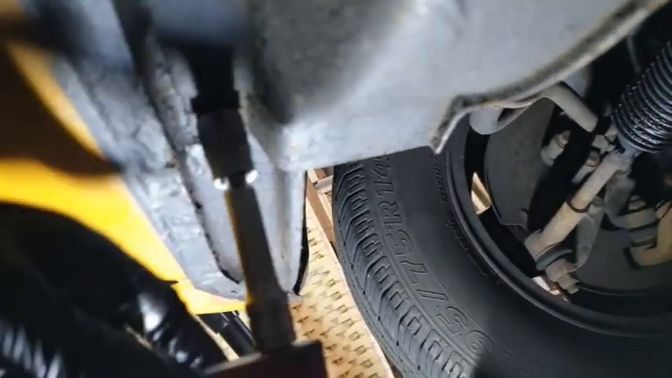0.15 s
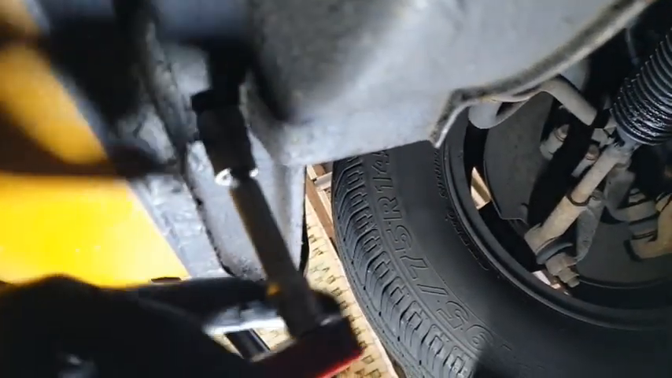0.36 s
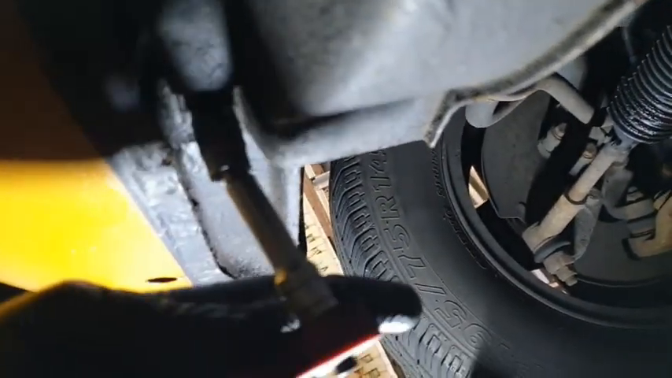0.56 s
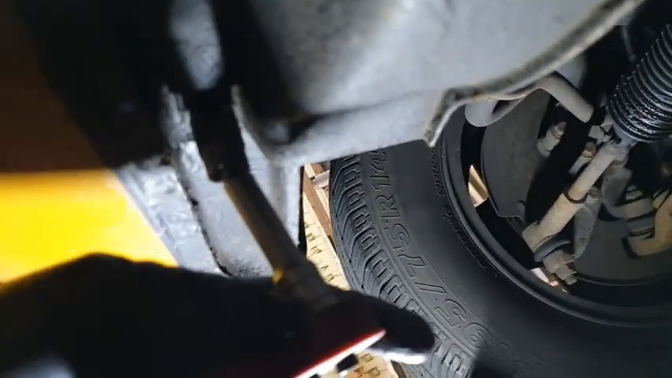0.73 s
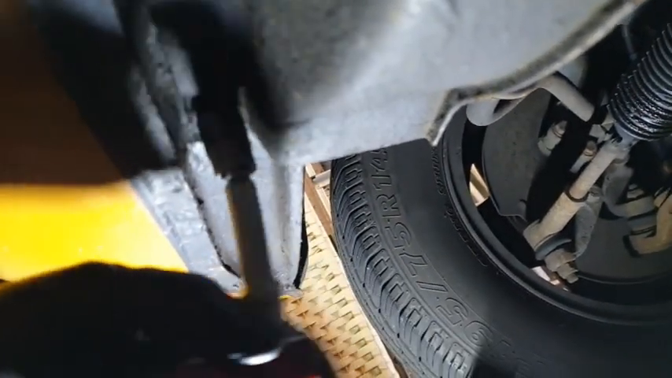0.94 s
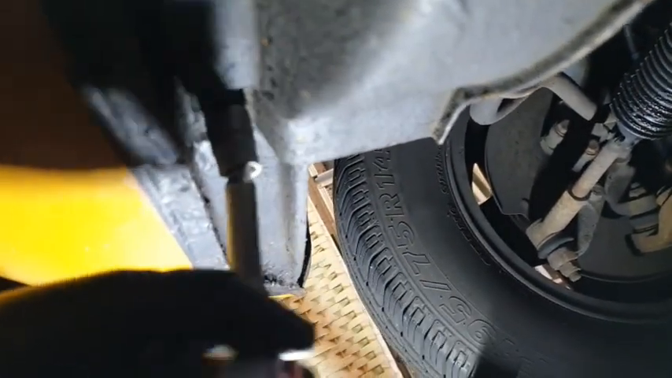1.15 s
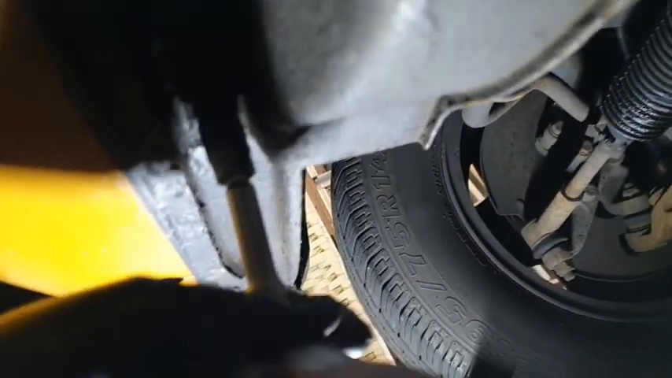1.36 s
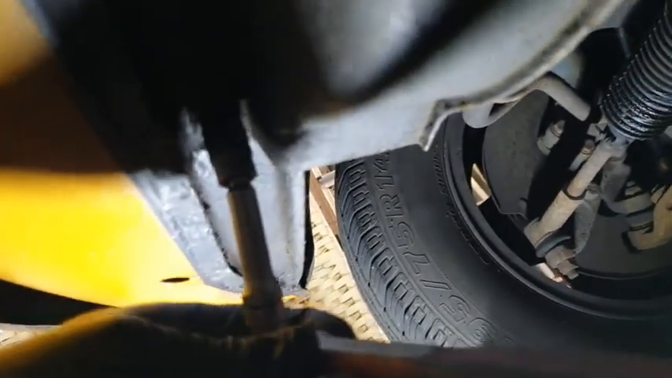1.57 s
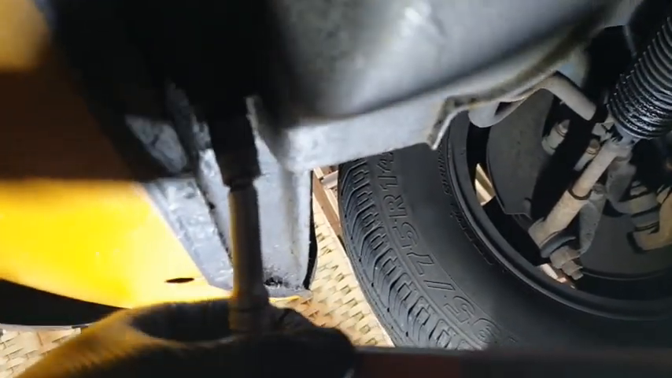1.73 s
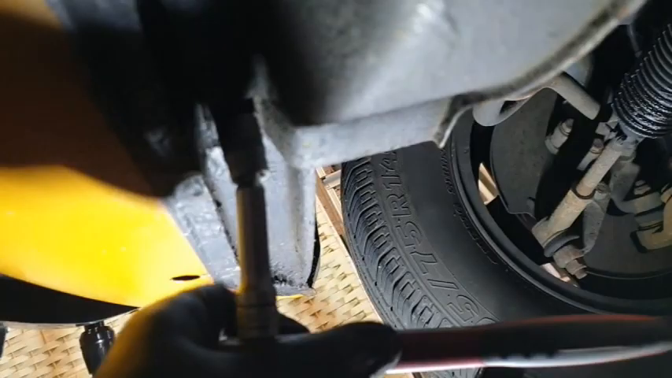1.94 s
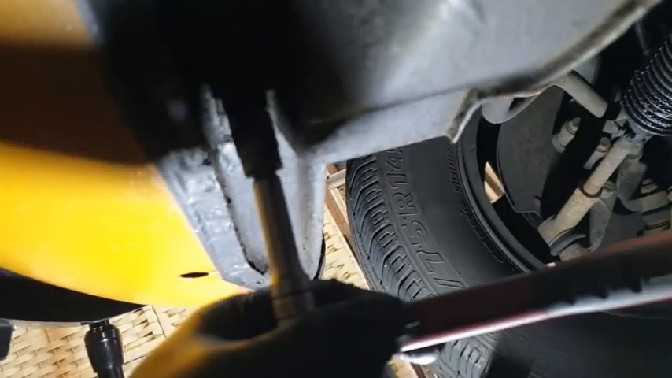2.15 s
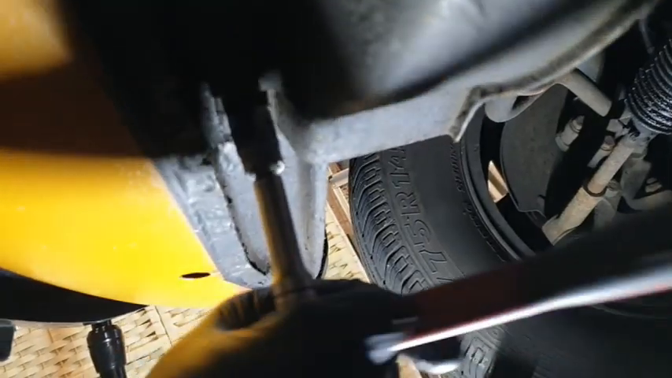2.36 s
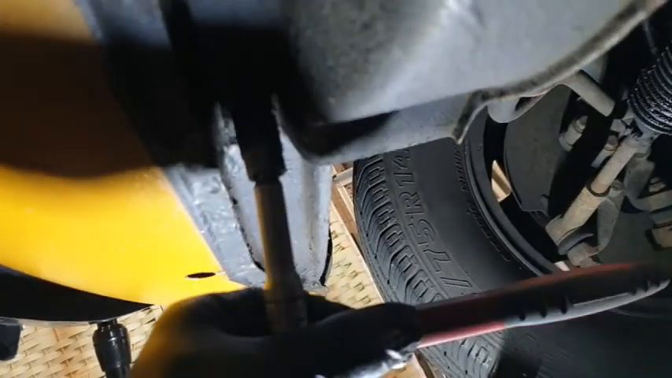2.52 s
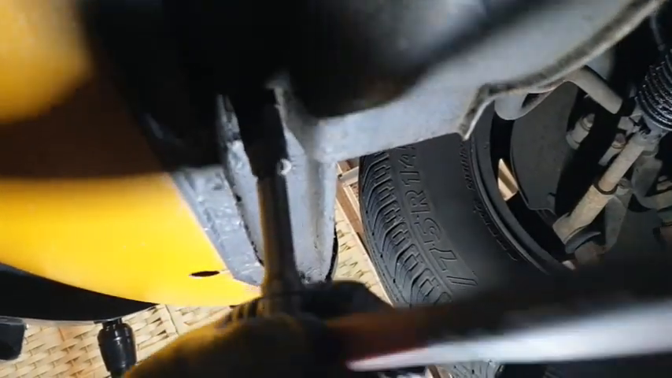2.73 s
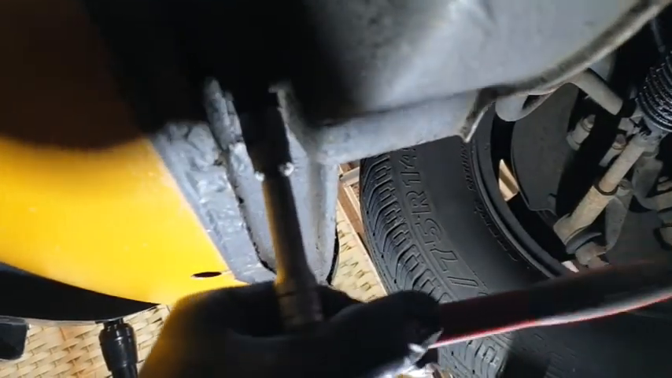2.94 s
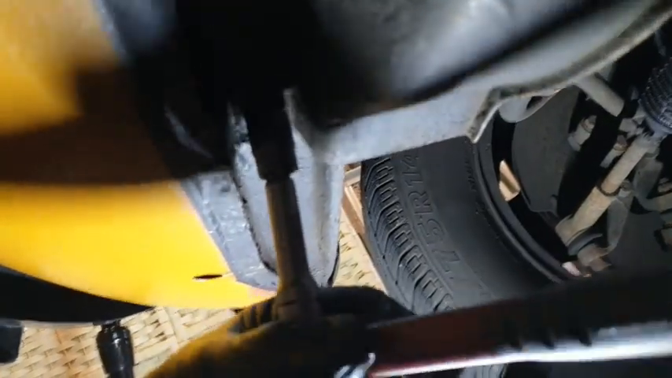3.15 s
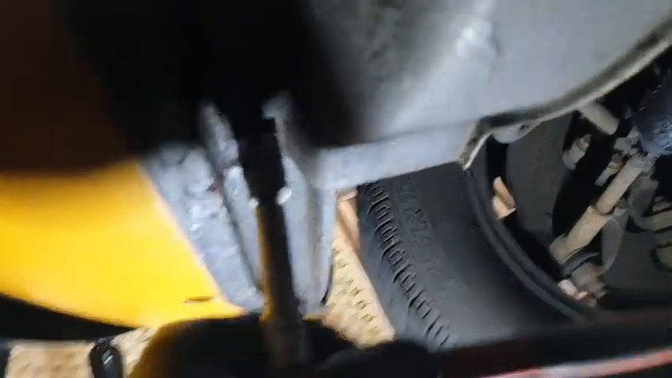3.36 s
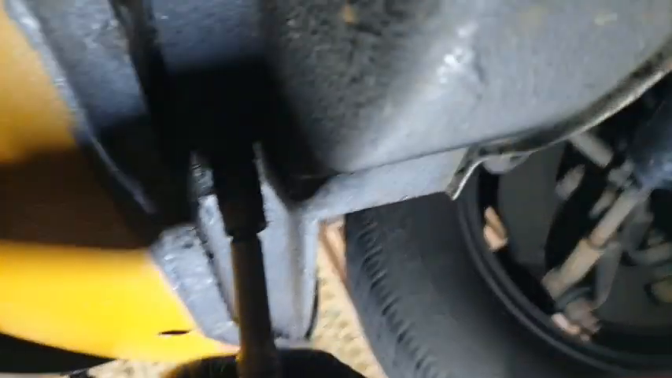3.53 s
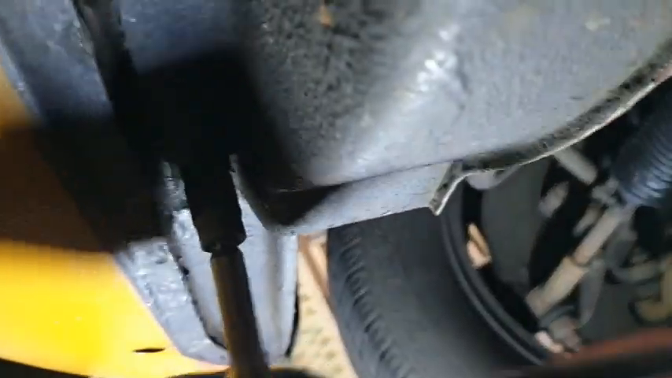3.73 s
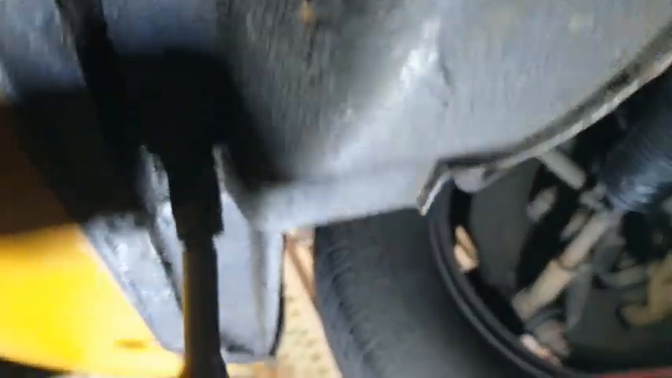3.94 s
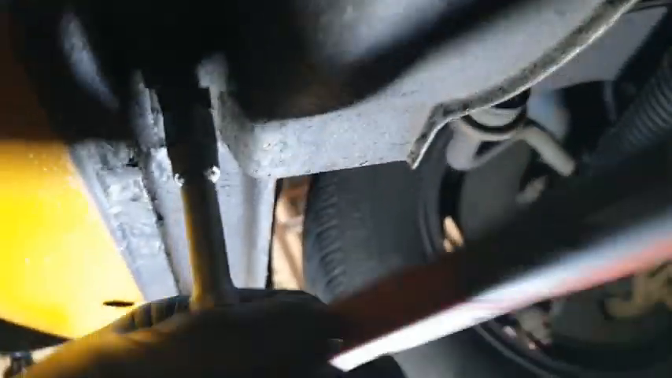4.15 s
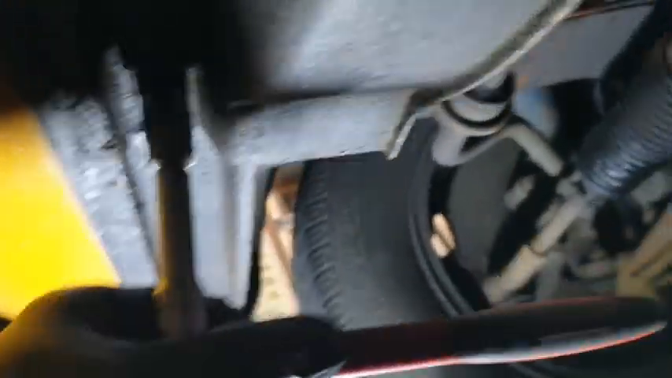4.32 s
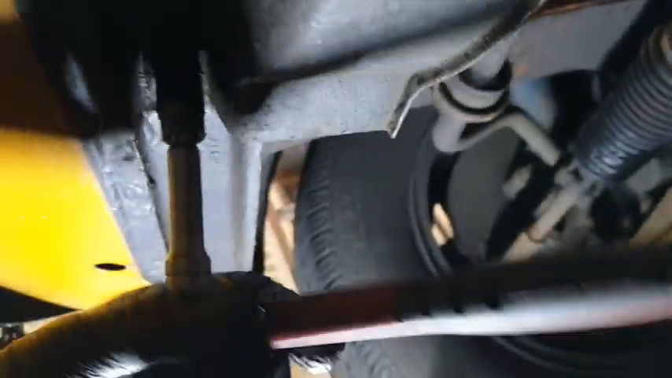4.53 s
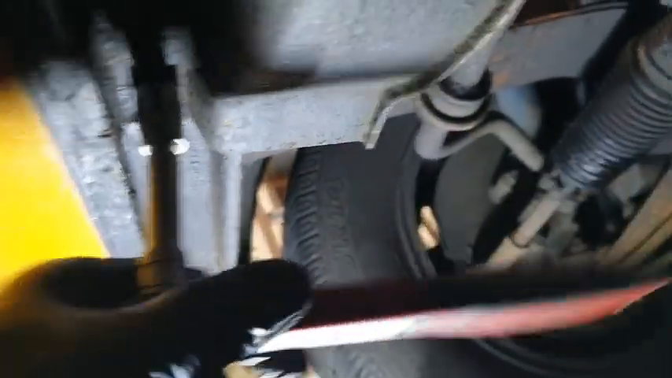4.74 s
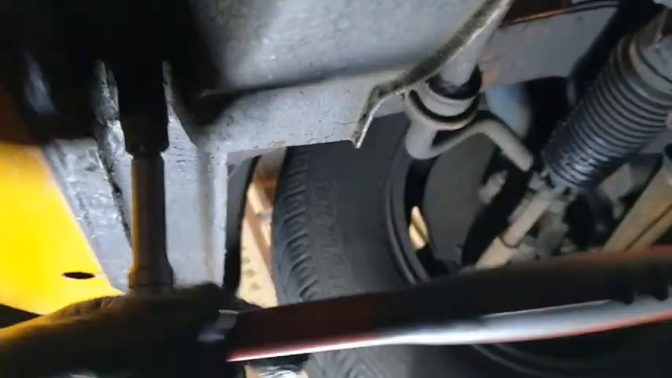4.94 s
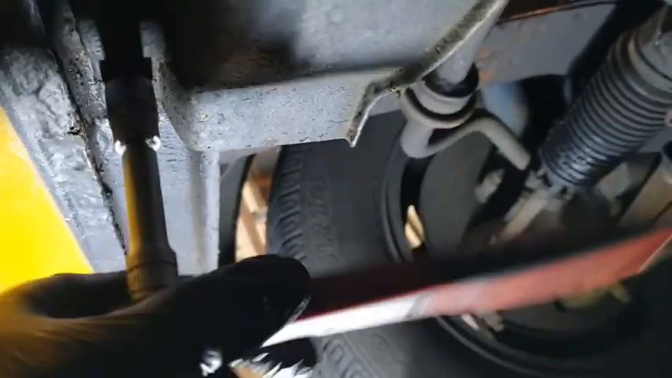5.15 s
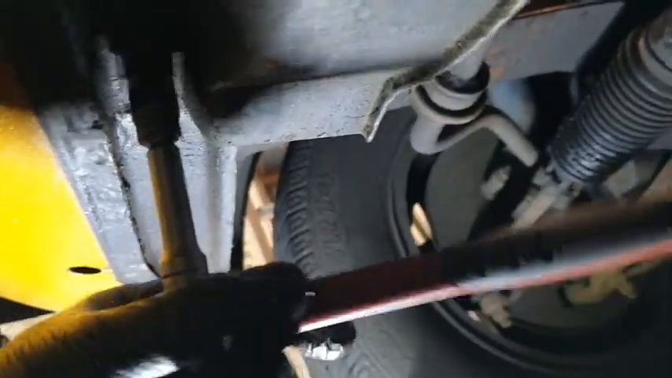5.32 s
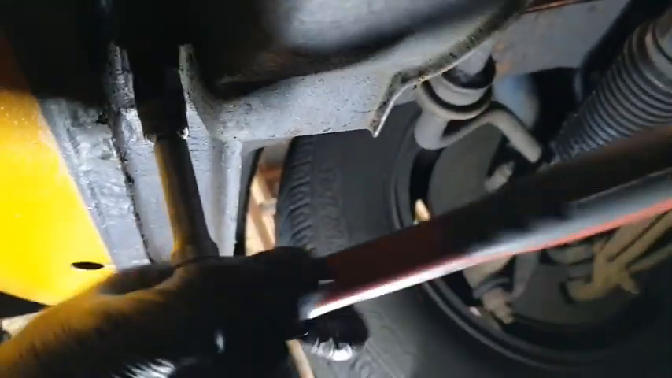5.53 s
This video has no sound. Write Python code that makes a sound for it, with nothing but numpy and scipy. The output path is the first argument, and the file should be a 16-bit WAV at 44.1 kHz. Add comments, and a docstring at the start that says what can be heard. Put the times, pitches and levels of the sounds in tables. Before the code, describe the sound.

First come faint cloth brushes, low handling bumps and dull, hollow knocks of a loose socket, growing busier. Then a ratchet handle works back and forth: three to six fast bright clicks per back swing, a short rough forward turn, repeated about twice a second. The sound is near and dry, coloured by the car's underbody and a small, still garage.

```python
"""A ratchet's pawl snaps over a few teeth on each back swing of eight strokes, ringing the steel.
A gloved hand first fits the socket to a bolt under a car; the socket knocks in its play.
Snaps, knocks and joint taps are noise bursts shaped by underbody and garage echoes, then filtered.
Thread, socket scrape, glove and sleeve are grainy coloured noise, gated by the moves of the hand.
Handling rumble, groans and soft thumps lie below, over the still air of the garage."""
import sys
import numpy as np
from scipy import signal
from scipy.fft import rfft, irfft
from scipy.io import wavfile
from scipy.ndimage import uniform_filter1d

SR = 44100
rng = np.random.default_rng(int(sys.argv[2]) if len(sys.argv) > 2 else 0)


def output_pcm(signal):
    """Save a mono or channel-first signal as 16-bit PCM at the path in sys.argv[1].

    Samples are clipped to [-1, 1] before scaling.
    """
    pcm = np.clip(np.atleast_2d(signal).T, -1, 1) * 32767
    wavfile.write(sys.argv[1], SR, np.round(pcm).astype(np.int16))


N = 246078
BLOW_SAMPLES = 16384
TIME_S, AGE_S = np.arange(N) / SR, np.arange(BLOW_SAMPLES) / SR  # scene time, time since a blow
HZ = np.fft.rfftfreq(2 * BLOW_SAMPLES, 1 / SR)


def amp(db):
    """Amplitude ratio of a level in dB."""
    return 10 ** (np.asarray(db) / 20)


def read(points, hz):
    """A spectrum joined by straight lines on a log-frequency axis."""
    point_hz, value = np.transpose(points)
    return np.interp(np.log(hz + 1), np.log(point_hz + 1), value)


def add(mix, start_s, sound):
    """Mixes a sound into the scene from start_s on."""
    part = mix[:, max(round(start_s * SR), 0):][:, :sound.shape[1]]
    part += sound[:, :part.shape[1]]


def move(start_s, length_s, rise_s, fall_s, sag_db_per_s=0):
    """Gain of one move of the hand: linear rise, hold with optional sag, exponential fall."""
    age_s = np.maximum(TIME_S - start_s, 0)
    rise = np.minimum(age_s / rise_s, 1)
    fall = np.exp(-np.maximum(age_s - length_s, 0) / fall_s)
    return rise * amp(-sag_db_per_s * age_s) * fall


def bump(hz, centre_hz, width_hz):
    """The shape of one resonance, 1 at its top."""
    return 1 / (1 + (2 * (hz - centre_hz) / width_hz) ** 2)


# Resonances and hollows of floor pan and gap below. Each row: centre in Hz, width in Hz, gain in dB.
PANEL_MODES = [(192.8, 21.3, 12), (280, 50, 5.5), (405, 17, 3), (548, 38, 7), (599, 164, -6),
               (754, 19.3, 6), (875, 150, 3.5), (1224, 98, 5.5), (1300, 58, -9), (1500, 19, -4.5),
               (1606, 28, 3), (1682, 44, 4.5), (1770, 60, 7), (1924, 16, 8), (2380, 58, 4), (2930, 81, 4.5),
               (5650, 160, 3)]


def panels_db(hz):
    """Colour that the car's panels give to whatever shakes them."""
    return sum(db * bump(hz, centre_hz, width_hz) for centre_hz, width_hz, db in PANEL_MODES)


def contact_modes_db(depth_db, width_hz, count=16):
    """Each new contact point favours other modes of the steel; width_hz holds at 5 kHz."""
    centres_hz = np.geomspace(1300, 14500, count) * rng.uniform(.93, 1.07, count)
    heights = rng.uniform(.3, 1.2, count)
    shape = sum(height * bump(HZ, centre_hz, width_hz * np.sqrt(centre_hz / 5000))
                for centre_hz, height in zip(centres_hz, heights))
    return depth_db * (shape - uniform_filter1d(shape, 2001))  # less its average over 2.7 kHz


# Likeness of the two channels. Each row: frequency in Hz, correlation from -1 to 1.
CHANNEL_LIKENESS = [(50, 0.9), (130, 0.95), (300, 0.6), (550, 0.6), (850, 0.4), (1200, 0.069), (1800, -0.6),
                    (2600, 0.24), (4500, 0.099), (16000, -0.056)]
# Stereo balance. Each row: frequency in Hz, left minus right in dB.
CHANNEL_BALANCE = [(60, 0), (180, 4.5), (380, 8.5), (700, 6), (1300, 2), (2600, 2.5), (4500, 3),
                   (6200, -1.5), (7300, 7), (8600, 10), (10500, 7.5), (13500, 2), (15500, 2.5)]


def stereo(z, hz):
    """Two unrelated spectra become left and right, alike and balanced by frequency."""
    same = np.clip(read(CHANNEL_LIKENESS, hz), -1, 1)
    tilt = amp(read(CHANNEL_BALANCE, hz) / 2)
    right = same * z[0] + np.sqrt(1 - same ** 2) * z[1]
    return np.array([z[0] * tilt, right / tilt])


def coloured(sound, colour_db):
    """Minimum-phase filter: the colour rings after the blow, never before."""
    log_gain = np.log(amp(np.r_[colour_db, colour_db[-2:0:-1]]))
    response = np.exp(np.conj(signal.hilbert(log_gain)))[:len(HZ)]
    spectrum = stereo(rfft(sound, 2 * BLOW_SAMPLES), HZ)
    return irfft(spectrum * response)[:, :BLOW_SAMPLES]


# Reflections by band, levels relative to the underbody. Each row: centre in Hz, first flash in dB,
# underbody t60 in seconds, garage in dB, garage t60 in seconds.
ECHO_BANDS = [(100, -21, 0.16, -9, 0.47), (300, -9, 0.18, 2.5, 0.22), (800, -7, 0.14, -8.5, 0.17),
              (1800, 5.5, 0.11, -9, 0.12), (3880, 7.5, 0.039, -10, 0.12), (6700, 13.5, 0.044, -13, 0.13),
              (13100, 12, 0.055, -18.5, 0.16)]


def echoes(flash_s):
    """One blow as it arrives: a flash off the tool, dense underbody reflections, the garage."""
    z = rfft(rng.choice([-1., 1.], (2, BLOW_SAMPLES)), 2 * BLOW_SAMPLES)
    out = 0
    centres_hz = [row[0] for row in ECHO_BANDS]
    band_weights = np.eye(len(ECHO_BANDS))
    for weights, (hz, flash_db, near_t60_s, room_db, room_t60_s) in zip(band_weights, ECHO_BANDS):
        band = irfft(z * read(np.c_[centres_hz, weights], HZ))[:, :BLOW_SAMPLES]
        # flash_s is the time constant at 7 kHz; the treble of the flash dies first
        flash = np.exp(-AGE_S / (flash_s * (7000 / hz) ** .4))
        power = (amp(flash_db) * flash) ** 2
        power += amp(-60 * AGE_S / near_t60_s) ** 2
        power += amp(room_db - 60 * AGE_S / room_t60_s) ** 2
        out = out + band * np.sqrt(power * SR / power.sum())
    return out * (1 - np.exp(-AGE_S / .0001))


def blend(paths, shared):
    """Part of the echo pattern stays from blow to blow, part changes as hand and tool move."""
    shared = np.clip(shared, 0, 1)
    weights = rng.standard_normal(len(paths) - 1)
    moving = np.tensordot(weights / np.linalg.norm(weights), paths[1:], 1)
    return np.sqrt(shared) * paths[0] + np.sqrt(1 - shared) * moving


# Steel modes of wrench and extension. Each row: frequency in Hz, level in dB, t60 in seconds.
STEEL_MODES = [(970, -27.5, 0.32), (1790, -34.5, 0.066), (2295, -30, 0.56), (4270, -16.5, 0.057),
               (5670, -22.5, 0.075), (6300, -39, .1), (6800, -22.5, 0.11)]


def steel():
    """The tool's own modes: decaying sines, each with a random phase per channel."""
    out = 0
    for hz, db, t60_s in STEEL_MODES:
        phase = hz * AGE_S + rng.random((2, 1))
        mode = amp(-60 * AGE_S / t60_s) * np.sin(2 * np.pi * phase)
        out = out + amp(db) * mode / np.sqrt((mode ** 2).sum() / (2 * SR))
    return out


def friction(colour, grain_db, grain_s, panel_share):
    """Noise that comes in small uneven slips, coloured by what it shakes; its mono mix has rms 1."""
    hz = np.fft.rfftfreq(N, 1 / SR)
    slips = irfft(rfft(rng.standard_normal(N)) / (1 + (hz * grain_s) ** 2), N)
    slip_gain = amp(grain_db * np.clip(slips / slips.std(), -3, 3))
    z = rfft(rng.standard_normal((2, N)) * slip_gain)
    gain = amp(read(colour, hz) + panel_share * panels_db(hz))
    out = irfft(stereo(z, hz) * gain, N)
    return out / out.mean(0).std()


# Spectrum of the still garage. Each row: frequency in Hz, relative density in dB.
AIR_COLOUR = [(18, -33.5), (30, 16), (97, 11), (379, -12), (532, 7.5), (1330, -66), (6540, -29.5),
              (7260, -54), (11900, -37), (15500, -34.5)]
AIR_DB = -70.5


def air():
    """The still air of the garage: steady, faintly uneven noise."""
    return amp(AIR_DB) * friction(AIR_COLOUR, grain_db=1.5, grain_s=.01, panel_share=0)


# Soft low thumps. Each row: start in seconds, peak in dB, pitch in Hz.
THUMP_EVENTS = [(0.506, -42.5, 55.4), (2.553, -39.5, 100), (4.48, -40, 98), (5.375, -42, 188)]


def thumps():
    """A soft thump: a sine that swells for 25 ms and dies away."""
    out = np.zeros((2, N))
    swell = AGE_S / .025 * np.exp(1 - AGE_S / .025)
    for start_s, peak_db, hz in THUMP_EVENTS:
        add(out, start_s, amp(peak_db) * swell * np.sin(2 * np.pi * hz * AGE_S)[None])
    return out


# The hand leans on the tool. Each row: start in seconds, length in seconds, rumble level in dB.
LEAN_MOVES = [(0, 0.054, -51), (0.225, 0.051, -57), (0.415, .22, -53), (0.73, 0.091, -68), (0.985, .1, -54),
              (1.118, 0.41, -51), (1.62, 0.25, -53), (1.93, 0.37, -54.5), (2.302, 0.25, -58),
              (2.533, .25, -44.5), (2.786, 0.32, -48), (3.08, .32, -61), (3.474, 0.15, -49),
              (3.74, 0.14, -53), (4.224, 0.25, -56), (4.476, 0.28, -47.5), (4.814, 0.23, -57.5),
              (5.042, 0.46, -51.5), (5.491, .12, -45.5)]
LEAN_RISE_S, LEAN_FALL_S, LEAN_SAG_DB_PER_S, RESTING_RUMBLE_DB = 0.012, 0.026, 13, -62.5
# Groans as the hand changes grip. Each row: start in seconds, length in seconds, level in dB.
GROAN_MOVES = [(1.622, 0.11, -52), (1.777, 0.032, -44.5), (1.842, 0.024, -62.5)]
GROAN_RISE_S, GROAN_FALL_S = 0.0094, 0.034
# Spectrum of the rumble. Each row: frequency in Hz, relative density in dB.
RUMBLE_SPECTRUM = [(20, -22), (38, -17), (58, 1.5), (80, -2), (105, 0.5), (145, -5), (200, -8),
                   (400, -48.5), (1000, -53.5)]
# Spectrum of the groans. Each row: frequency in Hz, relative density in dB.
GROAN_SPECTRUM = [(40, -28), (100, -17), (140, 4.5), (185, 2), (260, -25), (500, -35), (2000, -70)]


def handling():
    """The tool rumbles under the weight of the hand, and groans as the grip changes."""
    weight = sum(amp(db) * move(start_s, length_s, LEAN_RISE_S, LEAN_FALL_S, LEAN_SAG_DB_PER_S)
                 for start_s, length_s, db in LEAN_MOVES)
    regrip = sum(amp(db) * move(start_s, length_s, GROAN_RISE_S, GROAN_FALL_S)
                 for start_s, length_s, db in GROAN_MOVES)
    rumble_gain = np.hypot(amp(RESTING_RUMBLE_DB), weight)
    rumble = rumble_gain * friction(RUMBLE_SPECTRUM, grain_db=-3.5, grain_s=0.046, panel_share=0.44)
    groan = regrip * friction(GROAN_SPECTRUM, grain_db=5.5, grain_s=0.021, panel_share=.4)
    return rumble + groan + thumps()


# Brushes along the tool while fitting it. Each row: middle in seconds, length in seconds,
# glove level in dB, sleeve level in dB.
BRUSH_MOVES = [(0.14, 0.14, -59, -84), (0.368, 0.19, -62.5, -73), (0.472, 0.036, -59, -82),
               (0.59, .09, -58, -79), (0.772, 0.079, -49.5, -88), (0.998, 0.064, -62, -77),
               (1.144, .06, -53.5, -58), (1.264, 0.034, -54, -57), (1.332, 0.048, -62, -77),
               (1.459, 0.067, -52.5, -85), (1.657, 0.18, -65, -66.5), (1.784, 0.031, -56.5, -70),
               (1.97, 0.066, -61.5, -72), (2.143, 0.082, -55, -59)]
RESTING_RUB_DB = -83
# Spectrum of the glove rub. Each row: frequency in Hz, relative density in dB.
GLOVE_SPECTRUM = [(300, -24.5), (1500, -10), (3500, -8), (4800, -3), (6400, 3.5), (8000, -2.5), (11000, 2),
                  (15500, -0.5)]
# Spectrum of the sleeve rub. Each row: frequency in Hz, relative density in dB.
SLEEVE_SPECTRUM = [(500, -29.5), (1800, -4), (3800, -3), (5000, 1), (6400, 1.5), (8000, -21), (15500, -11)]


def cloth(sliding):
    """Each brush of glove and sleeve swells and fades evenly; later the glove slides on the handle."""
    glove, sleeve = amp(RESTING_RUB_DB) + sliding, 0
    for middle_s, length_s, glove_db, sleeve_db in BRUSH_MOVES:
        swell = 1 / np.cosh(np.pi * np.clip((TIME_S - middle_s) / length_s, -10, 10))
        glove = glove + amp(glove_db) * swell
        sleeve = sleeve + amp(sleeve_db) * swell
    glove_rub = glove * friction(GLOVE_SPECTRUM, grain_db=2.5, grain_s=0.0019, panel_share=.3)
    sleeve_rub = sleeve * friction(SLEEVE_SPECTRUM, grain_db=1.0, grain_s=0.004, panel_share=.3)
    return glove_rub + sleeve_rub


# A free back swing, then a drive that turns the bolt. Each row: swing start in seconds, drive start
# in seconds, drive length in seconds, then drive levels of thread grind, socket scrape, glove slide in dB.
STROKE_MOVES = [(2.19, 2.349, 0.15, -47, -56, -67), (2.62, 2.785, 0.2, -51.5, -76, -68),
                (3.009, 3.221, 0.15, -51.5, -75, -67), (3.428, 3.695, 0.14, -53.5, -52.5, -71),
                (3.942, 4.158, 0.18, -51.5, -62.5, -70), (4.414, 4.671, 0.12, -53, -57, -63.5),
                (4.877, 5.102, 0.13, -51, -57, -70.5), (5.304, 5.511, .15, -42.5, -59, -66.5)]
SWING_S, SWING_GRIND_DB, SWING_SLIDE_DB = 0.2, -49.5, -70.5
STROKE_RISE_S, STROKE_FALL_S = 0.038, 0.059
STROKE_SAG_DB_PER_S = 14  # the hand eases off towards the end of each move


def strokes():
    """Gains of thread grind, socket scrape and glove slide as the handle swings back and drives."""
    grind = scrape = slide = 0
    shape = STROKE_RISE_S, STROKE_FALL_S, STROKE_SAG_DB_PER_S
    for swing_start_s, drive_start_s, drive_s, grind_db, scrape_db, slide_db in STROKE_MOVES:
        swing = move(swing_start_s, SWING_S, *shape)
        drive = move(drive_start_s, drive_s, *shape)
        grind = grind + amp(SWING_GRIND_DB) * swing + amp(grind_db) * drive
        scrape = scrape + amp(scrape_db) * drive
        slide = slide + amp(SWING_SLIDE_DB) * swing + amp(slide_db) * drive
    return grind, scrape, slide


# Colour of a knock or joint tap. Each row: frequency in Hz, gain in dB.
KNOCK_COLOUR = [(40, -4), (110, 5.5), (210, 12), (400, 11.5), (800, 12.5), (1400, 5.5), (3000, -2.5),
                (4200, -8), (8000, -25.5), (16000, -45)]


def rattle(turning, per_s, tap_db):
    """Tiny taps of four loose joints come at random, harder while the thread grinds."""
    tapped = rng.random(N) < per_s / SR
    strength = amp(3.43 * np.minimum(rng.exponential(1, N), 3))
    taps = tapped * strength * turning
    joint = rng.integers(0, 4, N)
    out = 0
    for k in range(4):
        colour = read(KNOCK_COLOUR, HZ) + panels_db(HZ) + contact_modes_db(depth_db=10.5, width_hz=200)
        tap = coloured(echoes(flash_s=0.00093), colour)
        out = out + signal.oaconvolve((taps * (joint == k))[None], tap, axes=1)[:, :N]
    return amp(tap_db) * out


# Fingers twist the socket onto the bolt. Each row: start in seconds, length in seconds, grind in dB.
TWIST_MOVES = [(0, 0.0081, -63), (0.4, 0.27, -59), (0.955, 0.35, -57.5), (1.207, 0.28, -52.5),
               (1.911, 0.21, -50.5)]
TWIST_RISE_S, TWIST_FALL_S, RESTING_GRIND_DB = 0.042, 0.035, -67
# Spectrum of the thread grind. Each row: frequency in Hz, relative density in dB.
GRIND_SPECTRUM = [(60, -8), (130, 0), (200, -1.5), (400, 8), (800, 1.5), (1400, -13.5), (3000, -16),
                  (6000, -19), (16000, -53)]
# Spectrum of the socket scraping in its play. Each row: frequency in Hz, relative density in dB.
SCRAPE_SPECTRUM = [(200, -14), (800, 1), (1500, 9.5), (3200, 2), (5000, -20.5), (8000, -28), (16000, -38.5)]


def thread(driven, scraping):
    """Thread grinds and joints rattle as the tool twists or strokes; under load the socket scrapes."""
    twisted = sum(amp(db) * move(start_s, length_s, TWIST_RISE_S, TWIST_FALL_S)
                  for start_s, length_s, db in TWIST_MOVES)
    turning = driven + twisted
    grind_gain = amp(RESTING_GRIND_DB) + turning
    grind = grind_gain * friction(GRIND_SPECTRUM, grain_db=2.5, grain_s=0.011, panel_share=0.85)
    scrape = scraping * friction(SCRAPE_SPECTRUM, grain_db=4.5, grain_s=0.004, panel_share=1.0)
    return grind + scrape + rattle(turning, per_s=45, tap_db=-23)


# Louder knocks of socket and extension on the bolt. Each row: start in seconds, relative level in dB,
# weight in dB, hardness in dB, main resonance in Hz.
KNOCK_EVENTS = [(0.213, -61, 2.5, 2, 720), (0.435, -67, 17.5, 4, 890), (0.475, -56, 0, 11, 1790),
                (0.556, -65.5, -13, 15, 1640), (0.618, -56, 6, -1, 860), (0.778, -70, 5, -29, 730),
                (0.825, -70, 1, -1, 890), (0.949, -70, 5, -1, 740), (0.988, -58.5, 2, -24, 706),
                (1.032, -56.5, 0, 6.5, 1800), (1.084, -58, 0, 2.5, 1900), (1.161, -53, 1.5, -36, 680),
                (1.219, -49, 8, 0, 1860), (1.271, -48.5, 4, 4, 1160), (1.333, -46, -0.5, 2, 1790),
                (1.409, -49, -10, 4, 1700), (1.474, -57, -1.5, 1.5, 900), (1.627, -66, 6, -18, 920),
                (1.902, -60.5, 1, 7, 796), (1.977, -52, 7, 0.5, 1270), (2.001, -58, -2, 9.5, 780),
                (2.017, -50, 2.5, -16, 820), (2.041, -51, -3, 0, 1800), (2.205, -58, -10, 13, 1800),
                (2.37, -48.5, 2.5, -12, 860), (2.409, -51, -7.5, 11, 1790), (2.492, -49.5, -4, -0.5, 1790),
                (2.529, -45.5, -2, -7.5, 1790), (2.605, -54, -5, -33, 780), (2.63, -48, 0, -11, 1780),
                (2.838, -55, 6.5, 6, 1800), (2.9, -61.5, -6.5, 8, 1800), (2.98, -62, 11.5, -19, 680),
                (3.252, -52, -4.5, 0, 800), (3.267, -49, -9, 3, 915), (3.391, -59, -8.5, -10, 520),
                (3.468, -54, 5.5, 10.5, 820), (3.477, -55.5, -8, 5, 830), (3.73, -50.5, -2.5, 5, 870),
                (3.777, -58.5, 5.5, -3, 803), (3.859, -56, -17, 4.5, 1790),
                (4.471, -43.5, -8.5, -4.5, 1800), (4.685, -67, -3, 17, 1230), (4.776, -57, 1.5, -1, 800),
                (4.818, -64, -14, 12, 1780), (4.898, -56, -8, 8, 1790), (5.097, -53, 0, 7.5, 1850),
                (5.128, -59, 7, 12.5, 1570), (5.18, -50.5, -4, -3, 880), (5.315, -58, -12, -14, 1790),
                (5.332, -56, 9, 1.5, 1670), (5.543, -52, -3, 10, 800)]


def socket():
    """Dull knocks pass through the bolt into the floor pan; the loose joint bounces once."""
    out = np.zeros((2, N))
    paths = np.array([echoes(flash_s=0.00061) for _ in range(10)])
    for start_s, db, weight_db, hard_db, main_hz in KNOCK_EVENTS:
        colour = read(KNOCK_COLOUR, HZ) + panels_db(HZ)
        colour += read([(300, weight_db), (600, 0.0055), (1500, 0.0016), (3500, hard_db)], HZ)
        colour += 7 * bump(HZ, main_hz, 120) + contact_modes_db(depth_db=7.5, width_hz=160)
        knock = coloured(blend(paths, shared=0.38), colour) + amp(-10.5) * steel()
        add(out, start_s, amp(db - 5.5) * knock)
        bounce = coloured(blend(paths, shared=0.33), colour)
        add(out, start_s + rng.uniform(0.002923, 0.012), amp(db - 10.5) * bounce)
    return out


# Light ticks of the loose ratchet head. Each row: start in seconds, relative level in dB.
TICK_EVENTS = [(0.357, -76), (1.147, -71.5), (1.901, -79), (2.018, -74), (2.204, -74), (2.372, -80),
               (2.974, -77), (3.256, -69), (3.477, -76), (3.779, -70), (4.2, -76.5), (4.683, -75),
               (5.128, -69.5), (5.333, -78), (5.544, -66.5)]
# Colour of a tick. Each row: frequency in Hz, gain in dB.
TICK_COLOUR = [(100, -16), (800, -9.5), (2500, -5.5), (4500, 7), (6400, 13.5), (8000, -0.5), (12000, -10),
               (15500, -5.5)]


def head_ticks(paths):
    """The loose ratchet head ticks lightly, sharing the echo paths of the pawl."""
    out = np.zeros((2, N))
    for start_s, db in TICK_EVENTS:
        colour = read(TICK_COLOUR, HZ) + contact_modes_db(depth_db=19.5, width_hz=670)
        add(out, start_s, amp(db) * coloured(blend(paths, shared=0.19), colour))
    return out


# Pawl snaps. Each row: start in seconds, relative level in dB, hollow knock in dB, body in dB,
# ring in dB, lower ring in Hz, upper ring in Hz.
SNAP_EVENTS = [(2.231, -39, 1, -3.5, 1.5, 2800, 6300), (2.26, -39, 8.5, -4.5, -2.5, 3920, 5750),
               (2.287, -39.5, 3, -2, -7.5, 3900, 5850), (2.6528, -43, -24, 9.5, -1.5, 4000, 5670),
               (2.666, -40, -4, 5, -1, 3830, 6740), (2.6783, -42, 10.5, 2.5, 2.5, 3150, 6900),
               (2.6978, -42, 5.5, 2.5, 2.5, 3790, 6660), (2.728, -40, -8, -6.5, -5.5, 2680, 6600),
               (2.7738, -39.5, -9.5, 0, -4, 4070, 5630), (3.063, -46.5, 9, 5, 3.5, 4230, 6460),
               (3.0822, -42.5, 18, -5.5, 0.5, 3420, 6600), (3.0967, -43.5, -7, 6, 4, 4300, 6840),
               (3.1151, -41, 7.5, -1.5, 0, 3370, 6100), (3.1333, -43.5, 8, -2.5, 2, 3050, 5800),
               (3.169, -43.5, 9.5, -3, 0.5, 2470, 5740), (3.5184, -44, -5, 9, 5, 3320, 5940),
               (3.5349, -43.5, 16, -3, -1, 3350, 7200), (3.5506, -39.5, -14, 5, -3, 4100, 6450),
               (3.5706, -44.5, -18, 3, 3, 4270, 6700), (3.9683, -42.5, -7, 2, -5, 3140, 6700),
               (3.9958, -40.5, 11, -3.5, -1.5, 4100, 6700), (4.0176, -39.5, -8, 3.5, -4.5, 4100, 5700),
               (4.039, -42.5, 10.5, -7.5, -1, 4100, 6960), (4.0682, -38, 9, -5.5, -4.5, 4100, 6850),
               (4.1203, -39.5, 14, -5.5, -4, 3700, 6600), (4.488, -42.5, 5, -1, 1, 3800, 6840),
               (4.5087, -42, 7, -4.5, -4.5, 3070, 7000), (4.531, -39, 0.5, -7.5, -2, 4000, 5450),
               (4.587, -41, 2.5, -9, -2.5, 4000, 6500), (4.9327, -44.5, 6, -3, 4, 4060, 6500),
               (4.9504, -40.5, 3, -8.5, -4.5, 2740, 6600), (4.9756, -40, 1, -7, -1.5, 3150, 7000),
               (5.0274, -46, 12.5, -3, -2, 3860, 6750), (5.356, -45, 0, -2.5, -3, 3900, 6530),
               (5.3726, -41.5, -4, -1, 0.5, 3700, 6850), (5.393, -39.5, 4, -6, -3, 4040, 6700),
               (5.423, -45, 3, 1, -0.5, 3850, 5940), (5.46, -42.5, -2, 0.5, -2.5, 3900, 7700)]
# Colour of a snap. Each row: frequency in Hz, gain in dB.
SNAP_COLOUR = [(40, -12.5), (110, -22), (220, 1), (500, 5.5), (850, 5.5), (1300, 0), (1800, 4), (2600, 0.5),
               (4700, 2), (6400, 11.5), (8000, 0), (11000, 1.5), (13000, 2), (15500, 2)]
# Two scrapes before each snap, a bounce after. Each row: mean delay in seconds, level re snap in dB.
SNAP_CONTACTS = [(-.0028, -25), (-.0013, -18), (.0042, -13)]
SNAP_PAN_DB = -1.8  # added to left minus right


def pawl():
    """The pawl scrapes up each tooth, snaps down, bounces, and rings the ratchet head."""
    paths = np.array([echoes(flash_s=0.0014) for _ in range(10)])
    out = np.zeros((2, N))
    for start_s, db, hollow_db, body_db, ring_db, lower_hz, upper_hz in SNAP_EVENTS:
        colour = read(SNAP_COLOUR, HZ) + panels_db(HZ)
        colour += read([(1700, body_db), (3500, ring_db + 3.5), (6300, ring_db - 2.0), (9500, 0.016)], HZ)
        # the pawl's two resonances shift from tooth to tooth; the socket adds a hollow knock
        colour += 6.5 * bump(HZ, lower_hz, 450) + 5.5 * bump(HZ, upper_hz, 600) - 2.6
        colour += hollow_db * bump(HZ, 810, 330)
        colour += contact_modes_db(depth_db=7.5, width_hz=380)
        gain = amp(db + SNAP_PAN_DB * np.array([[.5], [-.5]]))
        snap = coloured(blend(paths, shared=0.55), colour) + amp(body_db / 2) * steel()
        add(out, start_s, gain * snap)
        for delay_s, contact_db in SNAP_CONTACTS:
            contact_s = start_s + delay_s * rng.uniform(.7, 1.3)
            contact = coloured(blend(paths, shared=0.15), colour)
            add(out, contact_s, gain * amp(contact_db) * contact)
    return out + head_ticks(paths)


def scene():
    """Still air, hand, cloth, thread and socket under the snapping pawl."""
    driven, scraping, sliding = strokes()
    background = air() + handling() + cloth(sliding)
    return background + thread(driven, scraping) + socket() + pawl()


def record(dry):
    """A 32 Hz high-pass sheds the deepest bass; a low-pass ends the band at 15.9 kHz."""
    highpass = signal.butter(2, 32, "high", fs=SR, output="sos")
    lowpass = signal.firwin(255, 15900, window=("kaiser", 8), fs=SR)
    return signal.oaconvolve(signal.sosfilt(highpass, dry), lowpass[None], "same")


dry = scene()
out = record(dry)
output_pcm(out)
```